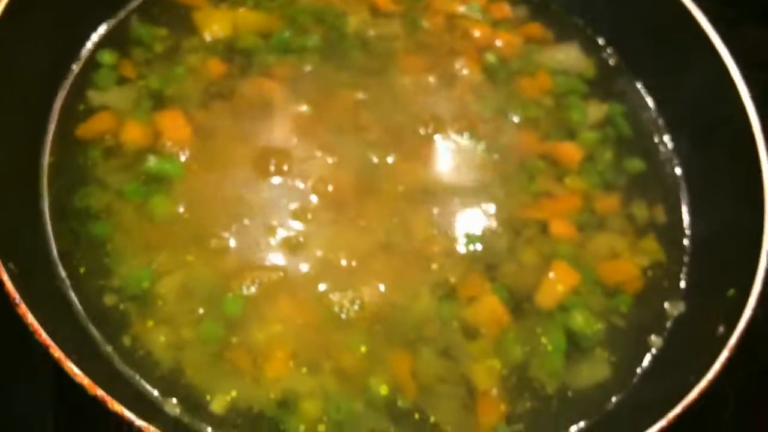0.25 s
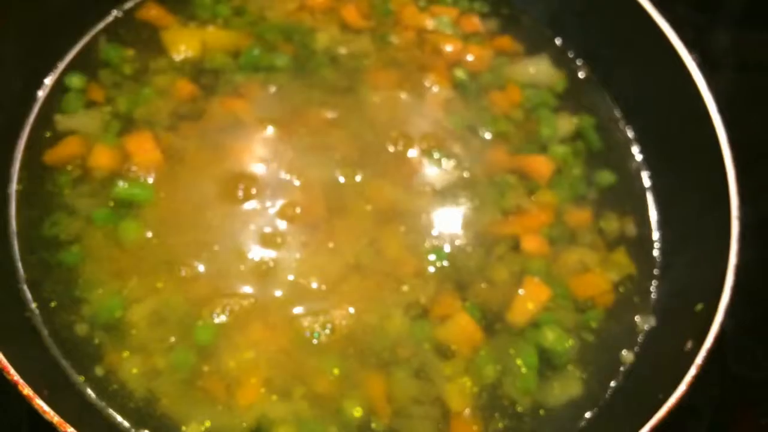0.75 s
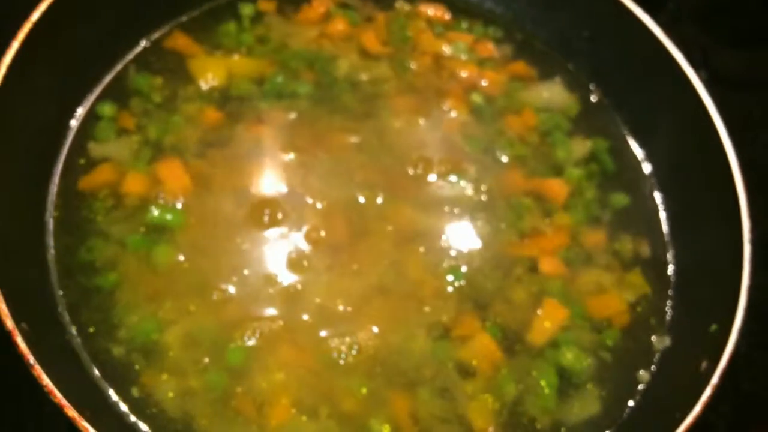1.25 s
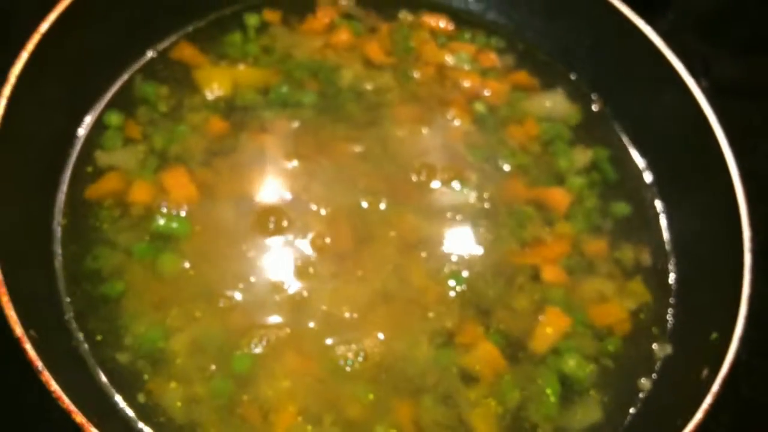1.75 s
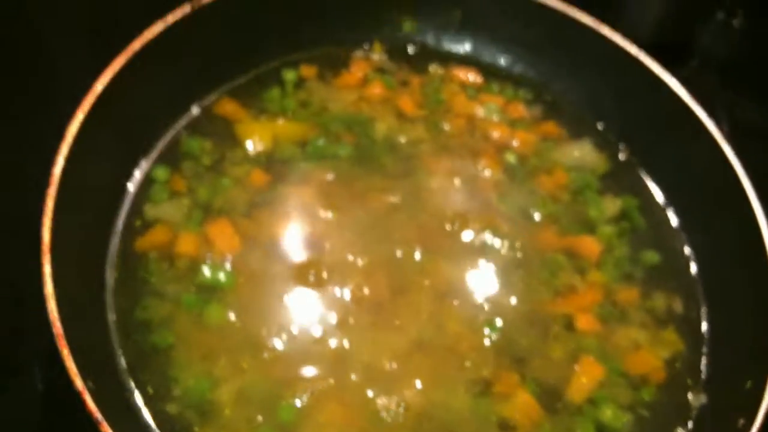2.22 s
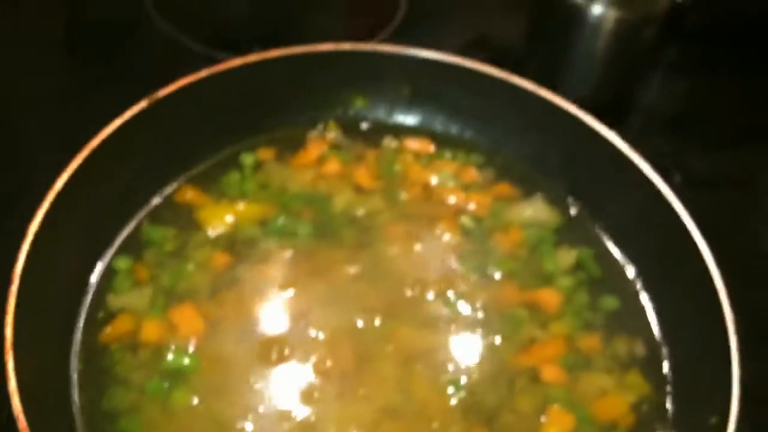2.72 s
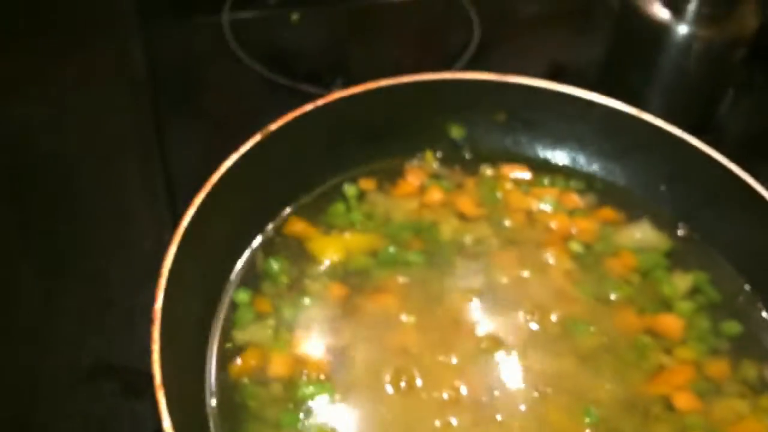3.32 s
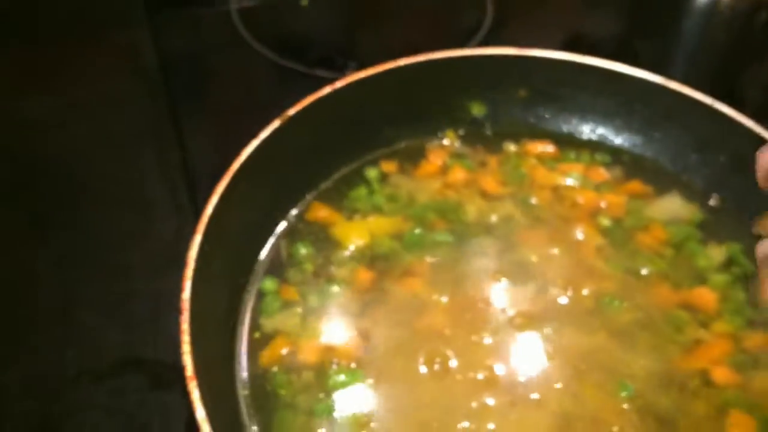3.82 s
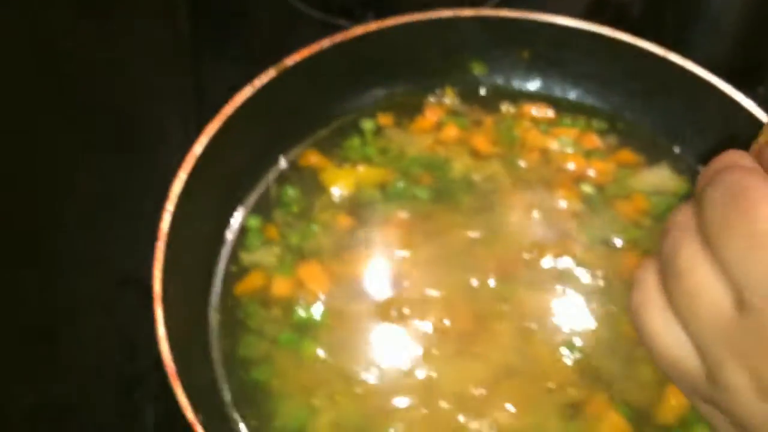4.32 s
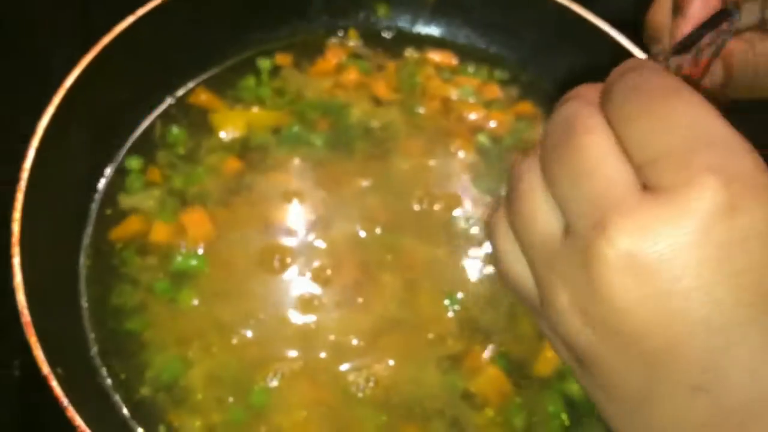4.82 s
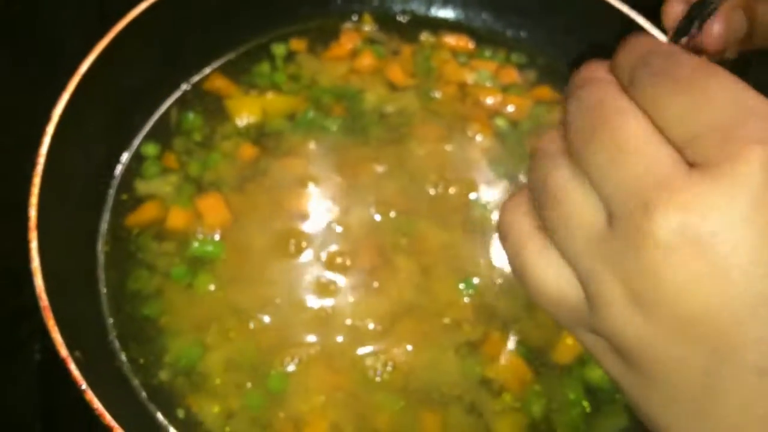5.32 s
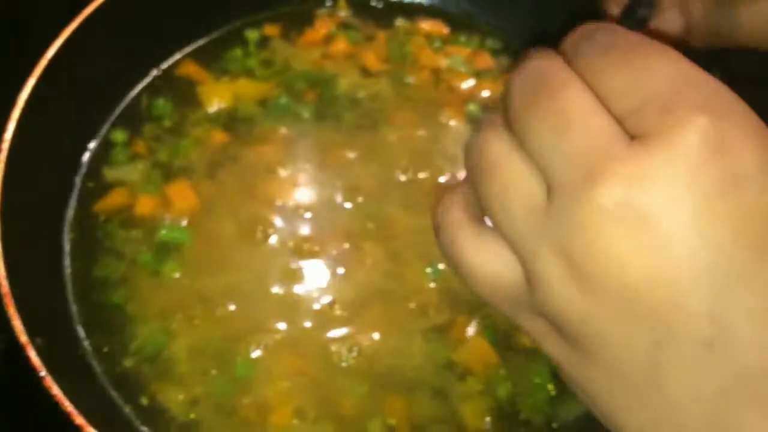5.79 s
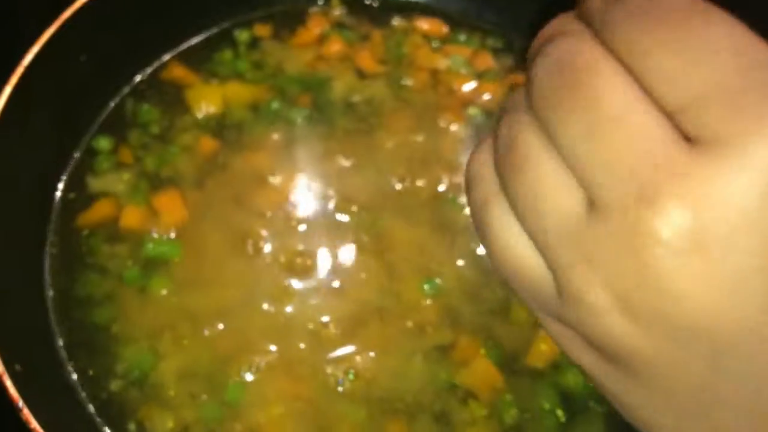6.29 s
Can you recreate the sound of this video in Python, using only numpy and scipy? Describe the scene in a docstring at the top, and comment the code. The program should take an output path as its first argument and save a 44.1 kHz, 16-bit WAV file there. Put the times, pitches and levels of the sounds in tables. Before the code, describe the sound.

Close to the microphone in a small, hard kitchen, quiet room hiss and low rumble come first. A foil sachet begins crackling in scattered snaps, is knocked hard on the worktop twice around two and a half seconds, then rustles lightly. Tearing and crumpling build into dense bright cracks, loudest after five seconds, before thinning out at the end.

```python
"""Kitchen worktop: a foil sachet is handled, knocked down on it, then torn and crumpled close to a camera.
Snapping creases are noise bursts through a stiff panel; a fine rustle of ticks and hiss runs between them.
Knocks strike the worktop's modes, soft bumps are low filtered noise, swishes are fading noise bands.
A small hard kitchen rings briefly, by decaying noise tails, over quiet hiss, rumble and hum."""
import sys
import numpy as np
from scipy import signal
from scipy.fft import rfft, irfft, next_fast_len
from scipy.io import wavfile
from scipy.ndimage import map_coordinates

SR = 44100
rng = np.random.default_rng(int(sys.argv[2]) if len(sys.argv) > 2 else 0)


def undo_db(level):
    """Turn decibels back into plain size, where 20 dB means ten times bigger."""
    steps = np.asarray(level, float) / 20
    return 10 ** steps


def transcribe(u):
    """Save the signal u as a 16-bit wav file named by the first command-line argument.

    u: samples, shape (n,) or (channels, n), limited to [-1, 1]; the rate is SR.
    q: integer samples, one column per channel.
    """
    v = np.clip(np.atleast_2d(u).T, -1, 1)
    q = np.round(v * 32767).astype(np.int16)
    wavfile.write(sys.argv[1], SR, q)


N = 288849

# creases snapping: (time [s], direct peak [dB], panel ring [Hz], brightness [dB/octave])
CREASE_SNAPS = [(.8195, -32, 5110, 1.5), (.858, -31, 4600, -6.5), (.9639, -25.5, 5300, -3),
                (1.2177, -36.5, 12600, 8), (1.24, -43, 7080, -1), (1.2456, -27.5, 6930, 14.5),
                (1.296, -25.5, 7540, 2.5), (1.435, -27, 9100, 2.5), (1.5004, -39.5, 7710, 7),
                (1.792, -53.5, 7000, -4), (1.846, -48, 6460, -1), (1.877, -23, 5950, 8.5),
                (1.9469, -47, 4310, 10), (1.9748, -32.5, 5030, 0), (2.0182, -16.5, 4250, 0.5),
                (2.023, -15, 4450, -2.5), (2.1473, -27, 10200, -1), (2.176, -30, 6200, 8),
                (2.251, -46, 6500, 3), (2.319, -45.5, 5400, -3.5), (2.6604, -39, 2670, 0),
                (2.7283, -25, 7000, -1.5), (2.7485, -26.5, 6050, -5.5), (2.7695, -30, 7500, 9),
                (2.7855, -43, 7040, -3), (2.8735, -41, 3540, -3.5), (2.92, -47.5, 6000, 6.5),
                (3.0971, -33.5, 11630, 4.5), (3.29, -49, 5000, 1.5), (3.4559, -31.5, 3200, 3),
                (3.4905, -37.5, 3380, -1), (3.506, -25, 9600, -1), (3.5612, -19.5, 3600, 1.5),
                (3.5645, -20.5, 3220, 0), (3.5885, -23, 4340, 0.5), (3.849, -56, 3000, -3),
                (3.876, -46, 1730, -4), (3.911, -31, 1860, -6.5), (3.919, -27, 5800, -1.5),
                (3.9428, -29.5, 4130, -0.5), (4.0494, -45, 3290, .5), (4.0964, -37, 5570, 1),
                (4.1135, -39.5, 10000, -1), (4.174, -48, 5000, 7), (4.2481, -31, 7200, -1.5),
                (4.3, -45, 3190, 0), (4.312, -34.5, 1700, -4), (4.3357, -26, 10000, 6.5),
                (4.3434, -43, 1700, -9), (4.4282, -19.5, 3060, 0), (4.5093, -35, 1430, -3),
                (4.6309, -37.5, 6850, -1), (4.6398, -44, 3870, -2), (4.664, -33.5, 3430, -2.5),
                (4.7072, -39.5, 11900, 5), (4.7795, -26, 1720, -3), (4.815, -21, 11000, 4.5),
                (4.8204, -27, 10800, 16), (4.8634, -17, 8150, 2.5), (4.9119, -18.5, 9300, 3.5),
                (4.9924, -37, 4460, -3), (5.002, -35.5, 3150, 5), (5.0105, -38, 7010, 1),
                (5.034, -33.5, 11500, 4), (5.178, -28.5, 7500, -1.5), (5.2205, -44, 2630, 0.5),
                (5.2365, -51, 1500, -5), (5.2581, -18, 6300, 0.5), (5.2916, -17, 6140, -1),
                (5.3129, -21, 2540, -1.5), (5.3263, -16.5, 2670, 0), (5.3331, -21, 11700, 1),
                (5.3662, -23.5, 3640, -3.5), (5.393, -23.5, 3850, 1), (5.4203, -25.5, 7060, -.5),
                (5.5279, -43.5, 1470, -4.5), (5.608, -55, 4800, -0.5), (5.6408, -10, 2010, 1.5),
                (5.6692, -23, 5940, 2), (5.675, -11.5, 4430, 4), (5.6994, -25, 3930, 1),
                (5.7085, -32, 4380, -5), (5.7233, -30, 4550, -3), (5.7586, -31, 2510, -3.5),
                (5.7649, -20.5, 8400, -1), (5.8089, -13.5, 6800, -2.5), (5.8606, -40, 1640, 9),
                (5.902, -20.5, 8100, -3.5), (5.92, -33.5, 2500, 5), (5.9614, -39, 4400, -5),
                (5.9938, -40, 3500, 1), (6.0174, -44.5, 4500, -1.5), (6.0378, -40, 4650, -3),
                (6.1604, -44.5, 8930, 0), (6.1962, -28.5, 5560, 4), (6.2175, -32, 2260, -1),
                (6.2333, -27.5, 2290, 0.5), (6.242, -30.5, 2280, -0.5), (6.2498, -16, 4370, 1.5),
                (6.3149, -47.5, 1640, -12.5), (6.3559, -45, 2150, -13), (6.3693, -24.5, 9500, 0.5),
                (6.4513, -19, 3800, 1), (6.4947, -24, 7500, 1.5), (6.511, -43, 9000, -2)]
# hard knocks on the worktop:
# (time [s], direct peak [dB], panel ring [Hz], brightness [dB/octave], push into the board [dB])
HARD_KNOCKS = [(2.4, -21.5, 4360, 2.5, -4), (2.4256, -25, 4230, 0.5, -7.5), (2.4881, -8.5, 4160, -4.5, -4),
               (2.5189, -7.5, 5040, -1.5, -7), (2.7189, -23.5, 980, -20.5, -6.5),
               (2.7353, -18.5, 2060, -8, 2.5), (2.7745, -31.5, 1420, -9, -24)]
# colour of foil noise: (frequency [Hz], relative level [dB])
FOIL_COLOUR = [(250, -15.5), (600, -16.5), (1300, -9), (2000, -4), (3000, -2.5), (5000, -2), (8000, -3),
               (11000, -5.5), (15000, -6.5)]


def unit(x):
    """Scales to rms 1."""
    return x / np.sqrt(np.mean(x ** 2) + 1e-20)


def along(points, hz):
    """Interpolates (Hz, value) points on a log frequency axis."""
    f, v = np.transpose(points)
    return np.interp(np.log(hz + 1), np.log(f + 1), v)


def filtered(x, response):
    """Applies a complex response of frequency to x."""
    m = next_fast_len(x.shape[-1] + 8192)
    spectrum = rfft(x, m) * response(np.fft.rfftfreq(m, 1 / SR))
    return irfft(spectrum, m)[..., :x.shape[-1]]


def resonance(f, hz, width_hz):
    """One causal resonance of peak gain 1."""
    return 1j * f * width_hz / (hz * hz - f * f + 1j * f * width_hz)


def foil_tilt(f, db_per_octave):
    """Brightness tilt [dB], zero at 4 kHz and flattening in the bass."""
    return db_per_octave * np.log2((f + 300) / 4300)


def wobble(knots_per_s):
    """Smooth random curve."""
    knots = rng.standard_normal(int(N * knots_per_s / SR) + 4)
    return map_coordinates(knots, [np.arange(N) * knots_per_s / SR])


def add(track, time_s, sound):
    """Mixes a sound into the track at time_s."""
    part = track[round(time_s * SR):][:len(sound)]
    part += sound[:len(part)]


def kitchen(x, size):
    """Room answer: a new noise tail per call, each frequency dying at its own speed."""
    # (frequency [Hz], t60 [s])
    decay = [(150, 0.41), (700, 0.23), (3000, 0.2), (12000, 0.14)]
    hz, t, z = signal.stft(rng.standard_normal(size), SR, nperseg=256)
    fade = undo_db(-60 * t / along(decay, hz)[:, None])
    tail = signal.istft(z * fade, SR, nperseg=256)[1]
    tail *= 1 - np.exp(-np.arange(len(tail)) / SR / 0.0011)
    return signal.fftconvolve(x, tail / np.linalg.norm(tail))


def air():
    """Room hiss: coloured noise with a slowly wavering level."""
    # (frequency [Hz], relative level [dB])
    colour = [(13, -73), (22, -14), (54, 0.5), (134, -7), (181, -5.5), (250, -10), (302, -8), (533, -16),
              (844, -17), (940, -15), (1490, -39.5), (2060, -34.5), (2490, -32), (14000, -29)]
    hiss = filtered(rng.standard_normal(N), lambda f: undo_db(along(colour, f)))
    return undo_db(-69.5 + 1.4 * wobble(4.37)) * unit(hiss)


def rumble():
    """Swelling low rumble: noise through a broad double resonance."""
    # (time [s], level [dB])
    swells = [(0.0, -62.5), (.97, -73), (1.18, -62), (1.5, -85), (1.86, -64.5), (2.92, -69), (3.12, -60),
              (3.56, -57.5), (3.72, -77), (3.98, -57), (4.3, -67), (4.56, -70), (4.83, -61), (5.27, -68.5),
              (5.75, -66), (6.11, -81), (6.55, -78)]
    level_db = np.interp(np.arange(N) / SR, *np.transpose(swells))
    low = filtered(rng.standard_normal(N), lambda f: resonance(f, 42, 77) ** 2)
    return undo_db(level_db) * unit(low)


def hum():
    """Wavering low hum: noise through narrow double resonances."""
    # (centre [Hz], width of each resonance [Hz], mean level [dB])
    bands = [(55, 27, -72.5), (136.5, 5.8, -75), (183, 21, -70.5)]
    out = np.zeros(N)
    for hz, width_hz, db in bands:
        level = undo_db(db + 0.8 * wobble(3.32))
        out += level * unit(filtered(rng.standard_normal(N), lambda f: resonance(f, hz, width_hz) ** 2))
    return out


def swishes():
    """Short swishes of a hand or cloth: broad noise bands that start quickly and fade."""
    # (time [s], rms before the fade [dB], centre [Hz], fade t60 [s])
    strokes = [(.005, -65, 2280, 0.13), (.11, -67, 1900, 0.097), (0.219, -64.5, 2000, 0.51),
               (0.511, -71, 2500, 0.82), (1.109, -72.5, 2100, 0.54), (1.224, -53.5, 5500, 0.29),
               (1.416, -65, 2150, 0.39), (1.47, -59, 9000, 0.24), (1.66, -60.5, 8150, 0.16),
               (2.008, -40, 5000, .05), (3.179, -56.5, 990, 0.2), (3.598, -60, 1400, 1),
               (5.538, -48, 706, 0.046)]
    out, t = np.zeros(N), np.arange(SR // 2) / SR
    for time_s, db, hz, t60_s in strokes:
        band = unit(filtered(rng.standard_normal(len(t)), lambda f: resonance(f, hz, 0.86 * hz) ** 2))
        add(out, time_s, undo_db(db - 60 * t / t60_s) * band * (1 - np.exp(-t / 0.005)))
    return out


def crack(panel_hz, ring_db, tilt_db, t60_s, room_db, size):
    """Sudden dying foil noise rings a stiff panel (direct peak 1); the room answers."""
    def colour(f):
        return undo_db(along(FOIL_COLOUR, f) + foil_tilt(f, tilt_db))

    def panel(f):
        ring = undo_db(ring_db) * resonance(f, panel_hz, 0.19 * panel_hz)
        return (1 + ring) * 1j * f / (500 + 1j * f)

    t = np.arange(size) / SR
    lumps = undo_db(4.03 * np.repeat(rng.standard_normal(size // 32), 32))  # uneven grains
    crumple = lumps * undo_db(-60 * t / t60_s)
    spike = 1.52 * undo_db(-60 * t / 0.0026)
    onset = 1 - np.exp(-t / 0.00022)
    noise = filtered(rng.standard_normal(size), colour)
    snap = filtered(noise * (crumple + spike) * onset, panel)
    snap /= np.abs(snap).max()

    tail = kitchen(np.ones(1), size=size)
    tail = filtered(tail, lambda f: colour(f) * np.abs(panel(f)) ** 0.4)[:size]
    echo = kitchen(snap[:1024], size=size)[:size]  # keeps this snap's own fine colour
    tail = tail / np.linalg.norm(tail) + 1.6 * echo / np.linalg.norm(echo)
    wall_lumps = np.repeat(rng.standard_normal(size // 64), 64)
    tail *= undo_db(2.5 * wall_lumps * np.exp(-t / 0.04))  # near walls answer in lumps
    return snap + undo_db(room_db) * np.linalg.norm(snap) * tail / np.linalg.norm(tail)


def board(blows):
    """The worktop's modes, struck; neighbours alternate in sign."""
    # (frequency [Hz], width [Hz], level [dB])
    modes = [(161, 10, -1.5), (218, 29, -6), (266, 31, -10.5), (499, 40, -6.5), (581, 20, -4.5),
             (655, 19, 1), (755, 40, -5.5), (916, 53, -8.5)]

    def response(f):
        return sum((-1) ** k * undo_db(db) * resonance(f, hz, width_hz)
                   for k, (hz, width_hz, db) in enumerate(modes))
    return filtered(blows, response)


def soft_bumps():
    """Bumps through the worktop: a push and a short drag, dulled about one low pitch."""
    # (time [s], peak [dB], centre [Hz], drag t60 [s])
    contacts = [(.258, -47, 200, 0.13), (0.294, -44.5, 123, 0.098), (1.211, -43.5, 262, 0.07),
                (1.259, -43, 256, 0.076), (1.328, -41.5, 264, 0.085), (1.362, -46.5, 190, .07),
                (2.711, -39, 150, .04), (2.734, -26.5, 124, 0.065), (2.864, -41.5, 161, 0.13),
                (3.189, -45.5, 322, 0.14), (3.445, -50.5, 178, 0.14), (3.471, -52.5, 296, 0.082),
                (3.944, -45, 107, 0.087), (5.425, -47.5, 228, 0.4)]
    out, t = np.zeros(N), np.arange(SR // 4) / SR
    for time_s, db, hz, t60_s in contacts:
        push = 2.6 * undo_db(-60 * t / 0.006)
        drag = rng.standard_normal(len(t)) * undo_db(-60 * t / t60_s)
        bump = filtered(push + drag, lambda f: resonance(f, hz, 0.4 * hz) / (1 + 1j * f / 1000) ** 2)
        add(out, time_s, undo_db(db) * bump / np.abs(bump).max())
    return out


def worktop():
    """Knocks clatter and push the board; its ring and the soft bumps get a room answer."""
    ring_per_db = 0.26  # the panel's ring stands out more as the knock gets softer
    clatter, blows, t = np.zeros(N), np.zeros(N), np.arange(SR // 4) / SR
    for time_s, db, hz, tilt_db, push_db in HARD_KNOCKS:
        knock = crack(hz, -ring_per_db * db, tilt_db, t60_s=0.027, room_db=-3.5, size=14336)
        add(clatter, time_s, undo_db(db) * knock)
        grit = 1 + 0.58 * rng.standard_normal(len(t))
        add(blows, time_s, undo_db(push_db - 60 * t / 0.0017) * grit)
    thud = board(blows) + soft_bumps()
    return clatter + thud + undo_db(-8) * kitchen(thud, size=20480)[:N]


def aftermath(events, under_db, rise_s, t60_s):
    """Gain of a motion that swells after each event and fades; powers add."""
    power, t = np.zeros(N), np.arange(SR // 2) / SR
    swell = 1 - np.exp(-(t / rise_s) ** 2)
    for time_s, db, *_ in events:
        add(power, time_s, (undo_db(db + under_db - 60 * t / t60_s) * swell) ** 2)
    return np.sqrt(power)


def rustle():
    """Tiny creases tick in clumps over the hiss of sliding foil; fingers rub with a duller hush."""
    # foil moving in the hand: (time [s], rustle level [dB], hand friction level [dB])
    motion = [(0.0, -82, -78.5), (.7, -78.5, -72.5), (.89, -67, -75), (1.1, -98, -76), (1.26, -64, -75),
              (1.55, -80, -74.5), (1.79, -78, -75.5), (1.95, -58.5, -67.5), (2.24, -75, -72.5),
              (3.01, -75.5, -74), (3.48, -73, -68), (3.66, -74, -64), (3.92, -68, -72), (4.1, -71, -69.5),
              (4.72, -71.5, -71), (4.98, -77, -76), (5.33, -65.5, -69.5), (5.6, -69.5, -77),
              (5.97, -67, -79), (6.15, -72.5, -76), (6.37, -63, -74), (6.55, -87, -88)]
    # colour of the fingers' rub: (frequency [Hz], relative level [dB])
    skin_colour = [(400, -13), (900, 2.5), (1400, -2.5), (2000, -0.5), (3000, -6), (6000, -9.5),
                   (9000, -35.5)]
    time_s, foil_db, skin_db = np.transpose(motion)
    t = np.arange(N) / SR

    tick_chance = 260 / SR * undo_db(5 * wobble(30))  # per sample
    ticks = (rng.random(N) < tick_chance) * undo_db(2.3 * rng.exponential(1, N))
    tick_envelope = signal.fftconvolve(ticks, undo_db(-60 * t[:400] / 0.0044))[:N]
    grains = tick_envelope * rng.standard_normal(N)
    hiss = rng.standard_normal(N) * undo_db(2.9 * wobble(40))
    foil = filtered(0.84 * unit(grains) + hiss, lambda f: undo_db(along(FOIL_COLOUR, f) + foil_tilt(f, 1.7)))

    rub = rng.standard_normal(N) * undo_db(4.2 * wobble(25))
    skin = filtered(rub, lambda f: undo_db(along(skin_colour, f)))

    # foil unfolds after each snap or knock; the hand slides on after each knock
    unfolding = aftermath(CREASE_SNAPS + HARD_KNOCKS, under_db=-42, rise_s=0.03, t60_s=0.3)
    sliding_on = aftermath(HARD_KNOCKS, under_db=-39, rise_s=0.06, t60_s=0.52)
    foil_gain = np.hypot(undo_db(np.interp(t, time_s, foil_db)), unfolding)
    skin_gain = np.hypot(undo_db(np.interp(t, time_s, skin_db)), sliding_on)
    return foil_gain * unit(foil) + skin_gain * unit(skin)


def snaps():
    """Creases give way one by one, each a crack of slightly random length."""
    out = np.zeros(N)
    for time_s, db, hz, tilt_db in CREASE_SNAPS:
        t60_s = 0.016 * np.exp(0.17 * rng.standard_normal())
        add(out, time_s, undo_db(db) * crack(hz, 5.0, tilt_db, t60_s, room_db=-7.0, size=10240))
    return out


def scene():
    """Sums all sources at one microphone."""
    return (air() + rumble() + hum() + swishes() + worktop() + rustle() + snaps())[None]


def roll_off(x):
    """The treble ends steeply here."""
    return signal.sosfilt(signal.butter(12, 16530, fs=SR, output="sos"), x)


def record(dry):
    """The camera loses the deepest bass and drops steeply above its top band."""
    top_hz, bass_hz = 15200, 35

    def response(f):
        treble_drop = undo_db(-26 * np.clip((f - top_hz) / 250, 0, 1))
        return treble_drop * (1j * f / (bass_hz + 1j * f)) ** 2
    return roll_off(filtered(dry, response))


dry = scene()
out = record(dry)
transcribe(out)
```